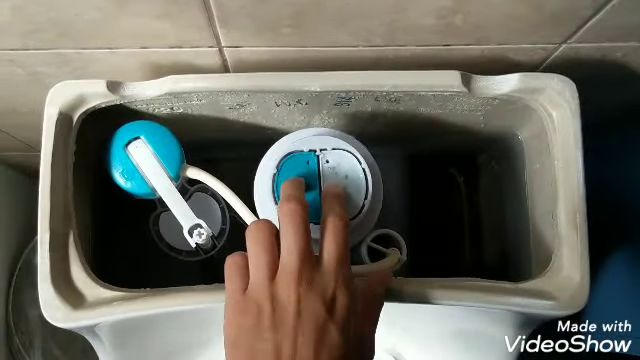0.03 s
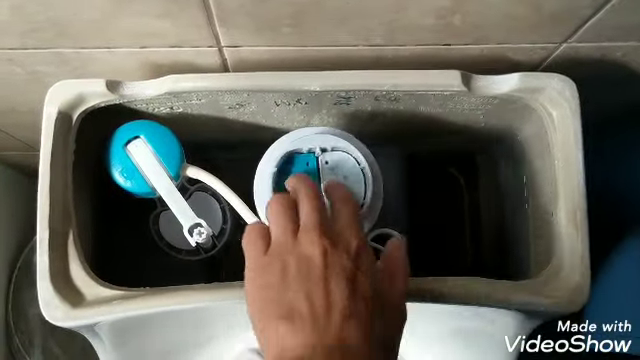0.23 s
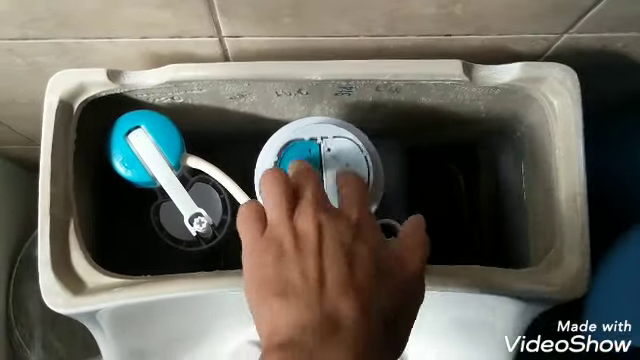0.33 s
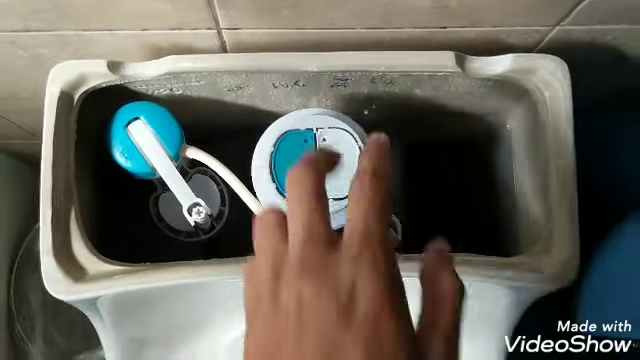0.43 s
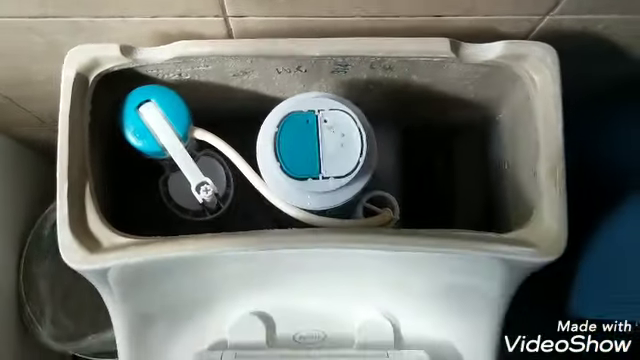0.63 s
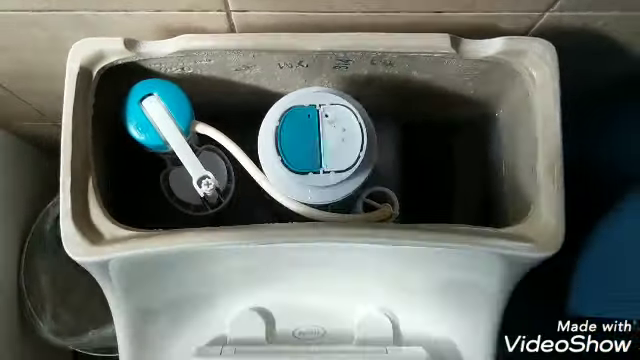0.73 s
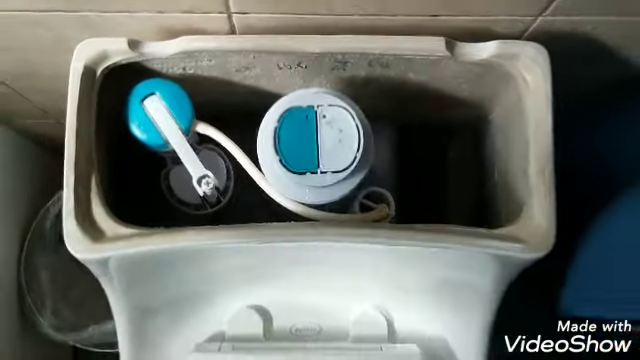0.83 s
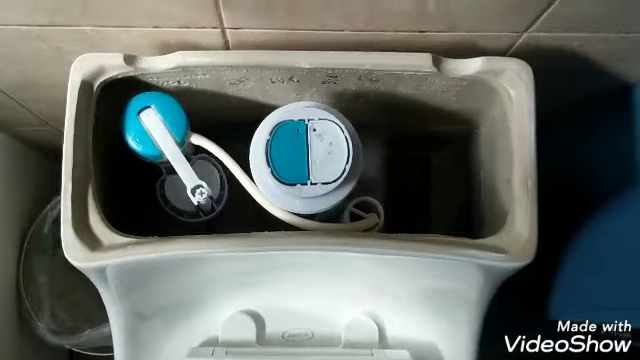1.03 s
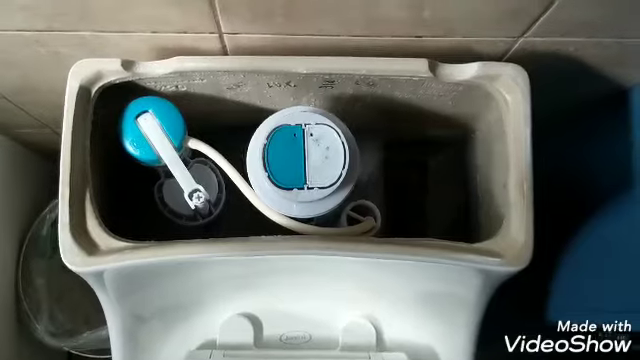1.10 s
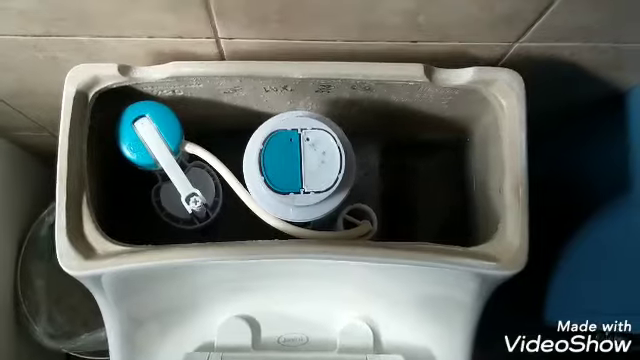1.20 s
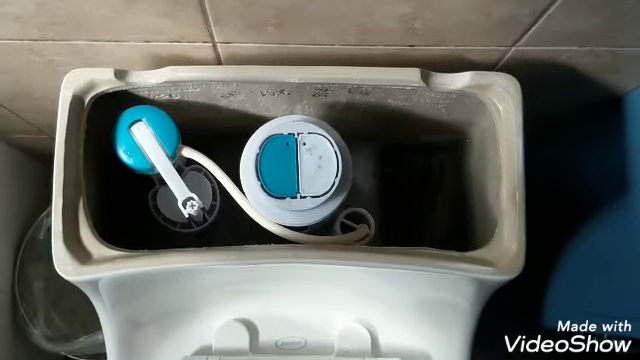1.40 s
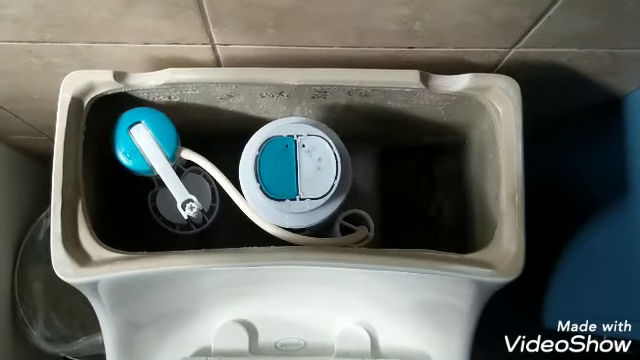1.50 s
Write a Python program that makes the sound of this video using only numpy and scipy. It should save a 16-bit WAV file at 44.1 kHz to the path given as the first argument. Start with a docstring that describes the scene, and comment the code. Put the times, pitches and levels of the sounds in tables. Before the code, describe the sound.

A toilet flush: a plastic button clacks, water rushes and gurgles, then a valve thuds shut.

```python
"""A toilet flushes from its open tank in a small tiled bathroom.
Water rushes down the outlet with a deep gulp, fizzing with tiny bubbles and stirring hollow tones.
The plastic button and its linkage squeak and clack as they are pressed and let go, and the valve drops
shut with a thud. Bubbles and drips ring in the tank while the water sloshes on, over a faint hum."""
import sys
import numpy as np
from scipy import signal
from scipy.fft import rfft, irfft
from scipy.io import wavfile
from scipy.ndimage import uniform_filter1d

SR = 44100
rng = np.random.default_rng(int(sys.argv[2]) if len(sys.argv) > 2 else 0)


def generate_wav(sig):
    """Save sig (samples, or channels by samples) to the path in sys.argv[1] as 16-bit PCM at SR."""
    pcm = np.round(np.clip(np.atleast_2d(sig).T, -1, 1) * 32767).astype(np.int16)
    wavfile.write(sys.argv[1], SR, pcm)


N = 68355
T = np.arange(N) / SR

# Tone colours of the background, the full rush and the thinner trickle that follows it.
# Each row: frequency in Hz, relative level in dB.
BACKGROUND_COLOUR = [(25, 9), (60, 15), (130, 13), (300, 10), (800, -1), (3000, -12), (8000, -15),
                     (16000, -19)]
FULL_FLOW_COLOUR = [(150, -15), (350, 7), (650, -4), (1000, -5), (1500, -0.5), (2500, -8), (4000, -10.5),
                    (6500, -15), (8500, -23.5), (15000, -31)]
THIN_FLOW_COLOUR = [(150, -16), (380, -5), (650, -9), (920, -2.5), (1500, -4), (2500, -3), (4000, -8.5),
                    (6500, -11.5), (8500, -20.5), (15000, -26.5)]
# Plastic knocks. Each row: start in seconds, five levels in dB (one per band, low to high),
# rise in seconds, fade in seconds. A fade is always the time a sound takes to drop by 60 dB.
PLASTIC_KNOCKS = [(0.102, -50, -34, -30.5, -33.5, -52, 0.012, 0.17),
                  (.200, -69, -52, -65, -38.5, -46.5, 0.0028, 0.15),
                  (.233, -47.5, -33.5, -31, -34.5, -56, 0.002, 0.2),
                  (.276, -28.5, -39, -33, -25.5, -52, 0.00042, 0.042),
                  (0.37, -62, -53, -50, -33, -48, .001, 0.036),
                  (0.426, -36.5, -22.5, -23, -20.5, -37.5, 0.0015, 0.23),
                  (0.432, -26, -55, -28, -33, -32.5, .002, 0.079),
                  (1.182, -22, -54, -49, -59, -63, .006, 0.27),
                  (1.189, -48, -42, -34, -48, -52, 0.005, 0.18),
                  (1.19, -29, -43, -21, -18.5, -39, 0.0018, 0.025)]
# A small catch in the button. Each row: start in seconds, level in dB, fade in seconds.
TICKS = [(.201, -39, 0.092), (.234, -38, .08)]
# Hits that make something ring. Each row: start in seconds, level in dB.
BUTTON_HITS = [(.233, -20.5), (.248, -22.5)]
LINK_HITS = [(.106, -38), (.276, -25)]
TANK_HITS = [(.429, -14)]
VALVE_HITS = [(1.192, -18.5)]
AIR_GULPS = [(.590, -8), (.669, -17.5), (.735, -20)]
# The tones those hits set off. Each row: pitch in Hz, level in dB added to the hit's, fade in seconds.
BUTTON_TONES = [(407.5, -0.5, 0.14), (753, -3.5, 0.13), (1220, -6, .15), (1645, -8, 0.15), (1772, -10, .25)]
LINK_TONES = [(1228, 3.5, 0.13), (1430, -5, 0.13), (2205, -3.5, 0.13), (3690, -19, 0.18), (3810, -8, 0.078)]
TANK_TONES = [(226, -10.5, 0.19), (490, -15.5, 0.49), (969, 0.5, 0.17), (1055, 3, 0.038), (1191, -9, 0.16),
              (1341, -1.5, 0.1), (2056, -11, 0.17), (2225, -14, 0.13), (3505, -3, 0.069),
              (4640, -10.5, 0.15), (5700, -12, 0.21), (5700, -12.5, 0.16), (7580, -25, 0.22)]
VALVE_TONES = [(121.8, -5, 0.54), (191.5, -2, 0.26), (226.1, -6, 0.42), (293, -0.5, 0.125),
               (490.6, -11, 0.35), (578, -17, 0.8), (755, -13.5, 0.47), (885, -6, 0.16), (1360, -35, 0.25),
               (2056, -21, 1)]
AIR_POCKET_TONES = [(120.1, 1.5, 0.29), (189, -3, 0.2), (297, -16, 0.15), (397, -26, 0.46),
                    (539, -27, 0.35), (714, -28.5, 0.48)]
# How loud each sound of moving water is over time. Each row: time in seconds, level in dB.
RUSH_LEVELS = [(0, -63.5), (.095, -59.5), (.17, -46.5), (.22, -37.5), (.30, -27), (.35, -34.5),
               (.42, -27.5), (.54, -33.5), (.66, -38), (.73, -38.5), (.85, -39), (1.0, -39), (1.16, -41),
               (1.2, -22), (1.28, -36.5), (1.40, -41.5), (1.55, -40.5)]
GURGLE_LEVELS = [(0, -65), (.095, -67), (.13, -44.5), (.19, -54), (.3, -47.5), (.5, -40.5), (.585, -31.5),
                 (.65, -31), (.72, -34.5), (.86, -29.5), (.96, -37.5), (1.06, -38.5), (1.17, -43.5),
                 (1.195, -30), (1.27, -29.5), (1.33, -38), (1.41, -39.5), (1.45, -55.5), (1.55, -50.5)]  # a low gurgle
GLUG_LEVELS = [(0, -77), (.3, -44.5), (.5, -39.5), (.57, -40), (.65, -30.5), (.71, -44), (.755, -35.5),
               (.79, -45), (.83, -35), (.865, -38.5), (.90, -48), (1.1, -48.5), (1.25, -40.5), (1.45, -62)]  # water glugging into the outlet
HOLLOW_LEVELS = [(0, -76), (.4, -41.5), (.56, -36.5), (.72, -45), (1.15, -53), (1.26, -33.5), (1.41, -41.5),
                 (1.55, -68)]  # the tank ringing as it empties and refills
BOOM_LEVELS = [(1.2, -56.5), (1.28, -61), (1.33, -42.5), (1.47, -38.5), (1.55, -43.5)]  # a low boom that swells after the valve shuts
WHISTLE_LEVELS = [(0, -110), (.5, -50.5), (.66, -44), (.73, -52.5), (.77, -38), (.83, -49.5), (.91, -44),
                  (.97, -65), (1.1, -52)]  # a thin ring while the water drains
# Where those sounds ring. Each row: pitch in Hz, rough width in Hz, relative level in dB.
GURGLE_RINGS = [(123.4, 45, -4), (206.8, 30.4, 0.5), (285.5, 40, -9.5), (400, 79, -21.5)]
GLUG_RINGS = [(475, 83, -8), (562.6, 62, -2), (660, 55, -4)]
HOLLOW_RINGS = [(971, 68, 12), (1410, 140, 6)]
BOOM_RINGS = [(115, 2.4, 0)]
WHISTLE_RINGS = [(1720, 27, 5), (2734, 130, 3.5)]
# Splashes in the tank. Each row: start in seconds, level in dB, middle pitch in Hz, fade in seconds.
TANK_SPLASHES = [(0.068, -57, 4500, 0.052), (.072, -48.5, 554, 0.24), (0.576, -29, 810, 0.066),
                 (0.632, -22.5, 930, 0.04), (0.655, -34, 4800, 0.07), (.747, -40.5, 6940, 0.064),
                 (0.796, -52, 10400, 0.15), (0.696, -30.5, 2620, 0.039), (.922, -40, 2400, 0.093),
                 (0.931, -38, 2820, 0.053), (.925, -53, 10600, 0.15), (0.996, -41.5, 5700, 0.08),
                 (1.072, -42, 3270, 0.059), (1.086, -26, 3020, 0.045), (1.085, -54.5, 11000, 0.21),
                 (1.112, -33.5, 4160, 0.1), (1.277, -34, 2440, 0.37), (1.357, -39.5, 4820, 0.19),
                 (1.424, -43, 4000, 0.19), (1.478, -51, 10400, 0.12)]
# Short sliding tones: a squeak as the button is pressed, then bubbles and drips. Each row: start in
# seconds, level in dB, starting pitch in Hz, fade in seconds, pitch slide in octaves per second.
SLIDING_TONES = [(0.212, -34.5, 1770, 0.26, 1.2), (.315, -38, 710, 0.32, -0.73),
                 (.385, -33.5, 641, 0.48, -0.76), (0.531, -32, 1453, 0.2, 0.32),
                 (0.544, -25, 294, 0.24, -0.81), (.562, -26.5, 594, 0.22, 2.2), (.580, -28, 400, .15, 0.23),
                 (.655, -32, 2155, 0.054, -0.92), (.812, -34, 585, 0.079, -1.6),
                 (.875, -24.5, 323.3, 0.11, -0.41), (.936, -20, 2600, 0.03, -1.8),
                 (.958, -37.5, 5080, 0.041, -1.6), (1.071, -27.5, 3390, 0.038, 3.1),
                 (1.088, -21.5, 3050, 0.021, 6.1), (1.090, -25, 3525, 0.02, 2),
                 (1.146, -34, 885, 0.51, -1.8), (1.427, -34.5, 3660, 0.11, -0.61),
                 (1.447, -39.5, 909, 0.3, -1.7), (1.495, -36.5, 930, 0.21, 2.8),
                 (1.520, -37.5, 819, 0.2, 2.6)]


def from_db(db):
    """Turn decibels into a number to multiply a sound by."""
    return 10 ** (np.asarray(db) / 20)


def rms_one(x):
    """Scale a sound so that its average strength (rms) is 1."""
    return x / np.sqrt(np.mean(x ** 2) + 1e-20)


def level(rows):
    """Join time and level points into a loudness curve."""
    return from_db(np.interp(T, *np.transpose(rows)))


def coloured(x, colour):
    """Give a sound a tone colour, at strength 1."""
    hz, db = np.transpose(colour)
    freqs = np.maximum(np.fft.rfftfreq(N, 1 / SR), 1)
    gains = from_db(np.interp(np.log(freqs), np.log(hz), db))
    return rms_one(irfft(rfft(x) * gains, N))


def band_noise(low_hz, high_hz):
    """Noise between two frequencies, at strength 1."""
    band = signal.butter(4, [low_hz, high_hz], "band", fs=SR, output="sos")
    return rms_one(signal.sosfilt(band, rng.standard_normal(N)))


def drift(per_s):
    """Wander around zero, reaching a new random value per_s times a second."""
    return np.interp(T * per_s, np.arange(1000), rng.standard_normal(1000))


def envelope(start, rise_s, fade_s):
    """A loudness curve that rises quickly and then dies away."""
    age = np.maximum(T - start, 0)
    return np.minimum(age / rise_s, 1) * from_db(-60 * age / fade_s)


def struck(hits, tones, rise_s):
    """Every hit makes all the tones of an object ring."""
    return sum(from_db(db + tone_db) * envelope(start, rise_s, fade) * np.sin(2 * np.pi * hz * (T - start))
               for start, db in hits for hz, tone_db, fade in tones)


def resonate(x, hz, width_hz):
    """Make a sound ring at one pitch; a narrower width rings longer."""
    decay = np.exp(-np.pi * width_hz / SR)
    feedback = [1, -2 * decay * np.cos(2 * np.pi * hz / SR), decay * decay]
    return signal.lfilter([1, 0, -1], feedback, x + 1e-18)


def echoes(x, fade_s):
    """Sound bounces between hard walls and blurs into a fading tail."""
    tail = rng.standard_normal(N) * envelope(0.0019, 0.0045, fade_s)
    return signal.fftconvolve(x, tail / np.sqrt(np.sum(tail ** 2)))[:N]


def background(hum_hz=58):
    """A faint, wavering hum and a soft, low noise."""
    hum = from_db(-55 - 2 * drift(per_s=11)) * np.sqrt(2) * np.sin(2 * np.pi * hum_hz * T)
    return hum + from_db(-58.5) * coloured(rng.standard_normal(N), BACKGROUND_COLOUR)


def knocks():
    """Each plastic knock scatters inside the tank as a dense, dying clatter."""
    edges_hz = [160, 300, 800, 2500, 7100, 16000]
    clatter = 0
    for band, (low, high) in enumerate(zip(edges_hz, edges_hz[1:])):
        loudness = sum(from_db(dbs[band]) * envelope(start, rise, fade)
                       for start, *dbs, rise, fade in PLASTIC_KNOCKS)
        clatter += loudness * band_noise(low, high)
    return clatter * from_db(0.65 * drift(per_s=600))


def button():
    """The button ticks, clacks its linkage and hits its stop, then springs back and jolts the tank."""
    tick_loudness = sum(from_db(db) * envelope(start, 0.0017, fade) for start, db, fade in TICKS)
    catch = tick_loudness * band_noise(7100, 9400)
    linkage = struck(LINK_HITS, LINK_TONES, rise_s=0.0068)
    stop = struck(BUTTON_HITS, BUTTON_TONES, rise_s=0.0048)
    jolt = struck(TANK_HITS, TANK_TONES, rise_s=0.0066)
    return catch + linkage + stop + jolt


def valve():
    """The valve drops onto its seat with a thud."""
    return struck(VALVE_HITS, VALVE_TONES, rise_s=0.0033)


def gulps():
    """Air is gulped at the outlet, and the air pocket rings with deep tones."""
    return struck(AIR_GULPS, AIR_POCKET_TONES, rise_s=0.0078)


def churn(rings):
    """Swirling water stirs a set of ringing pitches, each held at a nearly even strength."""
    sound = 0
    for hz, width, db in rings:
        ring = rng.standard_normal(N)
        for _ in range(2):
            ring = resonate(ring, hz, 1.24 * width)
        strength = np.sqrt(uniform_filter1d(ring ** 2, size=2200) + 1e-9)
        sound += from_db(db) * ring / strength
    return rms_one(sound)


def gurgling():
    """The hollow sounds of churning water each swell and fade in their own time."""
    return (level(GURGLE_LEVELS) * churn(GURGLE_RINGS)
            + level(GLUG_LEVELS) * churn(GLUG_RINGS)
            + level(HOLLOW_LEVELS) * churn(HOLLOW_RINGS)
            + level(BOOM_LEVELS) * churn(BOOM_RINGS)
            + level(WHISTLE_LEVELS) * churn(WHISTLE_RINGS))


def splashes(width_octaves=0.82, rise_s=0.0049):
    """Each splash is a soft burst of noise around its own pitch."""
    spread = 2 ** (width_octaves / 2)
    return sum(from_db(db) * envelope(start, rise_s, fade) * band_noise(hz / spread, hz * spread)
               for start, db, hz, fade in TANK_SPLASHES)


def squeak_and_bubbles(rise_s=0.0042):
    """The button's squeak, then each bubble or drip, sounds as one short, sliding, wobbling tone."""
    sound = 0
    for start, db, hz, fade, slide in SLIDING_TONES:
        pitch = hz * 2 ** (slide * np.clip(T - start, 0, fade))
        phase = 2 * np.pi * np.cumsum(pitch * (T > start)) / SR
        wobble = 0.65 * drift(per_s=min(83, hz / 10))
        sound += from_db(db) * envelope(start, rise_s, fade) * np.sin(phase + wobble)
    return sound


def fizz(bubbles_per_s=970, width_share=0.03976):
    """A crowd of tiny bubbles rings at random pitches and echoes inside the tank."""
    pitches_hz = np.geomspace(600, 7500, 90)
    strengths = from_db(4 * np.minimum(rng.exponential(1, N), 4)) * rng.choice([-1, 1], N)
    pops = strengths * (rng.random(N) < bubbles_per_s / SR)
    pitch_choice = rng.integers(0, len(pitches_hz), N)
    crowd = sum(hz * resonate(pops * (pitch_choice == k), hz, width_share * hz)
                for k, hz in enumerate(pitches_hz))
    return crowd + from_db(5) * echoes(crowd, fade_s=0.066)


def hiss(flicker_db=4.5):
    """Running water hisses, each band of the noise flickering on its own."""
    edges_hz = np.geomspace(150, 17000, 16)
    return sum(np.sqrt(high - low) * band_noise(low, high) * from_db(flicker_db * drift(per_s=60))
               for low, high in zip(edges_hz, edges_hz[1:]))


def spray(drops_per_s=8.3, fade_s=0.2):
    """Drops of spray make bright ticks at random moments."""
    drops = rng.random(N) < drops_per_s / SR
    decay = from_db(-60 / (fade_s * SR))
    loudness = signal.lfilter([1], [1, -decay], drops + 1e-18)
    return rms_one(loudness * band_noise(3100, 12200))


def rush():
    """Rushing water: fizz, hiss and spray follow the flow, which thins to a trickle near the end."""
    fizzing, hissing, spraying = fizz(), hiss(), spray()
    full, thin = [from_db(-5.5) * coloured(fizzing, colour) + from_db(-6.5) * coloured(hissing, colour)
                  for colour in (FULL_FLOW_COLOUR, THIN_FLOW_COLOUR)]
    thinning = np.interp(T, [1, 1.53], [0, 1])
    flow = (1 - thinning) * full + thinning * thin
    return level(RUSH_LEVELS) * (flow + from_db(-28) * spraying)


def scene(low_cut_hz=114):
    """Mix the flush into one channel; the clatter, squeak and water echo off the tiles."""
    clatter = knocks()
    water_and_squeak = rush() + squeak_and_bubbles() + splashes()
    low_cut = signal.butter(4, low_cut_hz, "high", fs=SR, output="sos")
    thumps = signal.sosfilt(low_cut, button() + valve() + gulps())
    direct = clatter + water_and_squeak + thumps + gurgling() + background()
    bathroom = echoes(from_db(-18) * clatter + from_db(-7) * water_and_squeak, fade_s=0.6)
    return (direct + bathroom)[None]


def record(dry, dip_hz=8440, dip_width_hz=1640, dip_depth=0.63, cutoff_hz=16000):
    """The microphone softens one band of the treble, and the very top is cut steeply."""
    dip_band = signal.lfilter(*signal.iirpeak(dip_hz, dip_hz / dip_width_hz, fs=SR), dry)
    top_cut = signal.ellip(10, 0.2, 80, cutoff_hz, fs=SR, output="sos")
    return signal.sosfilt(top_cut, dry - dip_depth * dip_band)


dry = scene()
out = record(dry)
generate_wav(out)
```